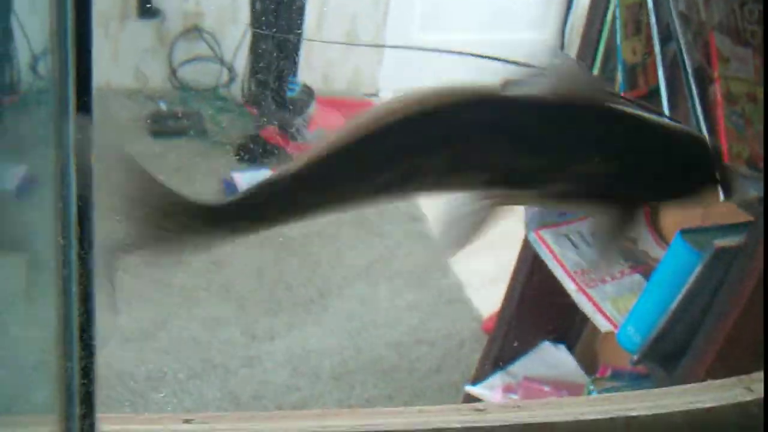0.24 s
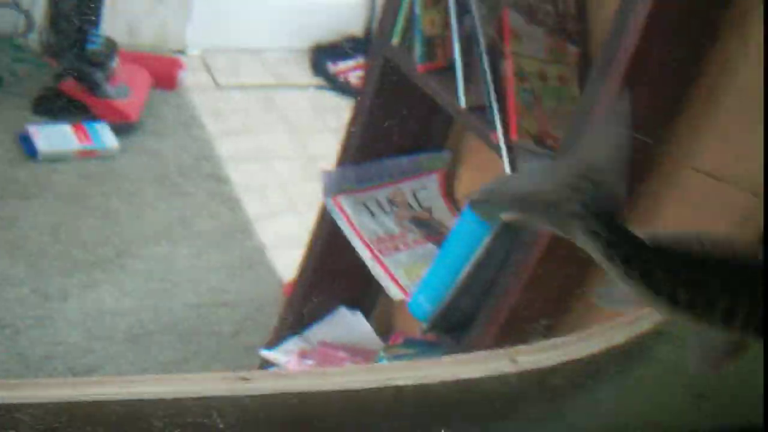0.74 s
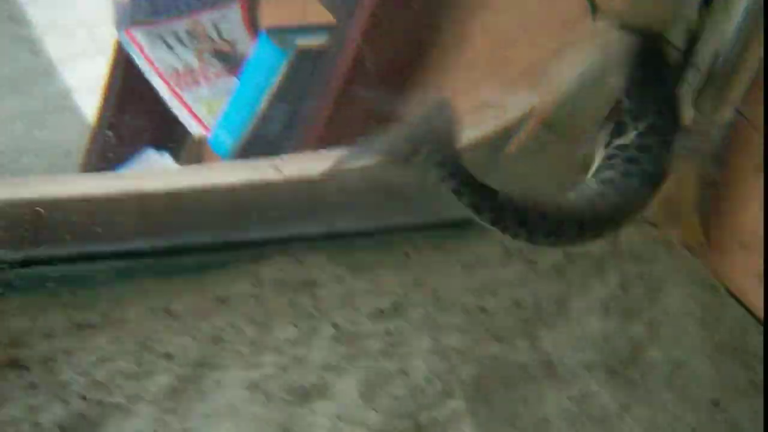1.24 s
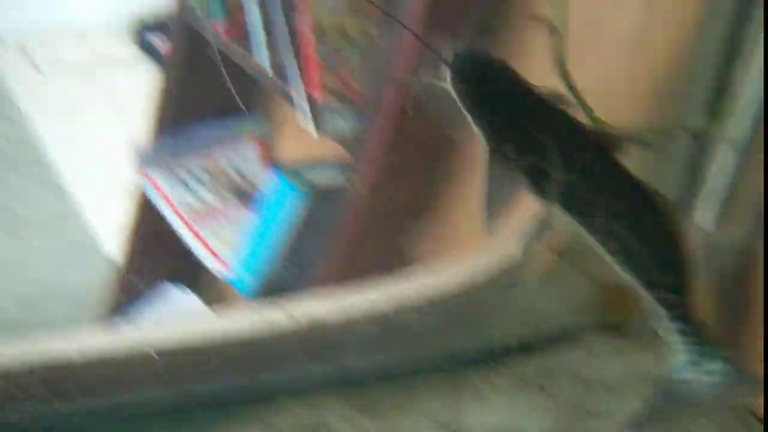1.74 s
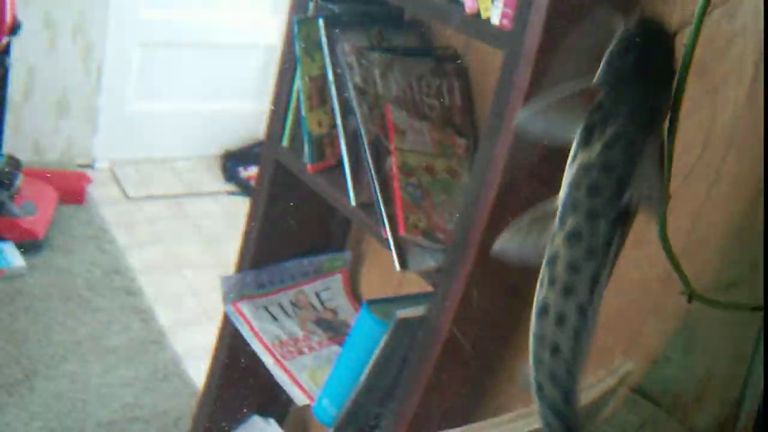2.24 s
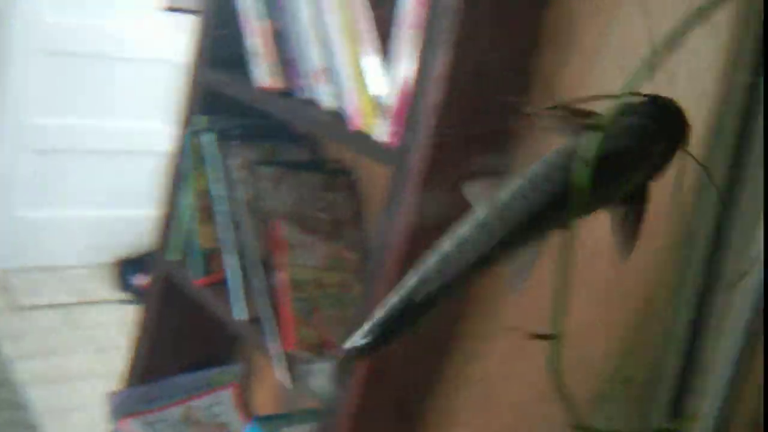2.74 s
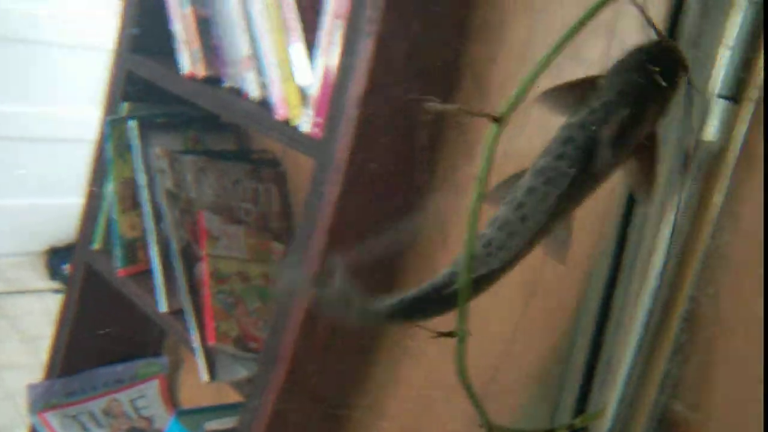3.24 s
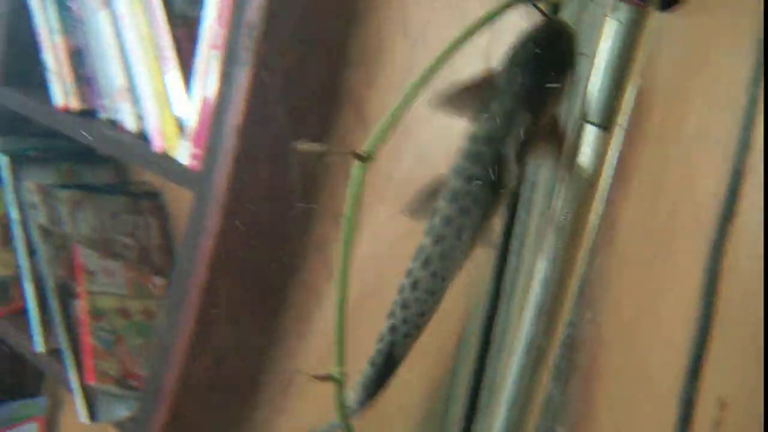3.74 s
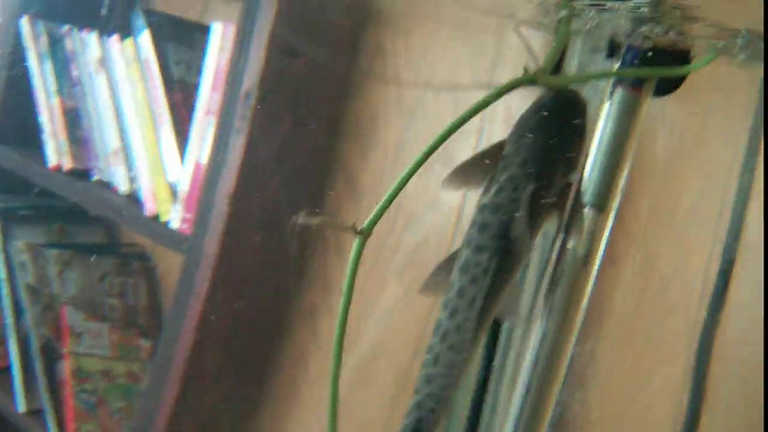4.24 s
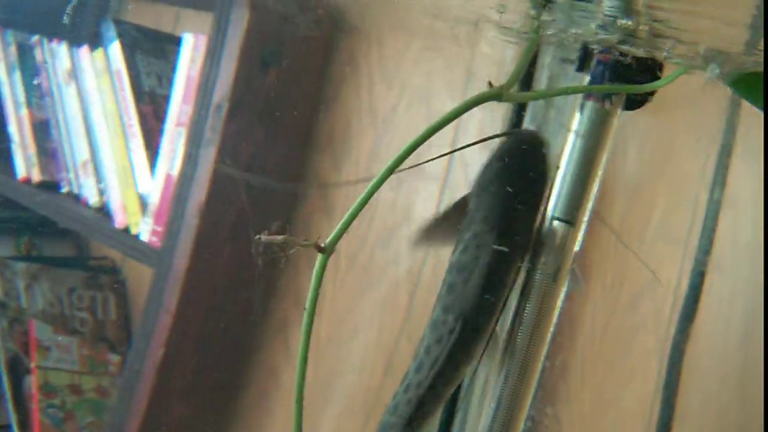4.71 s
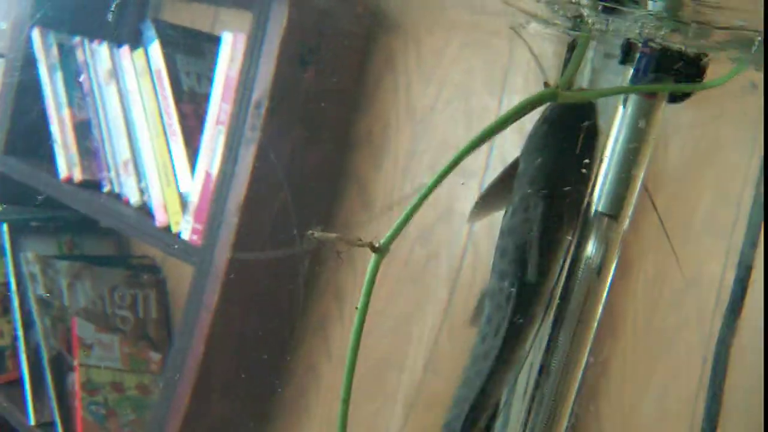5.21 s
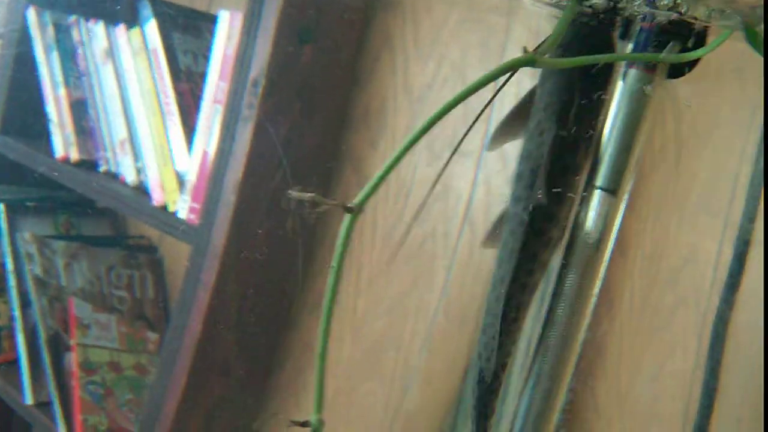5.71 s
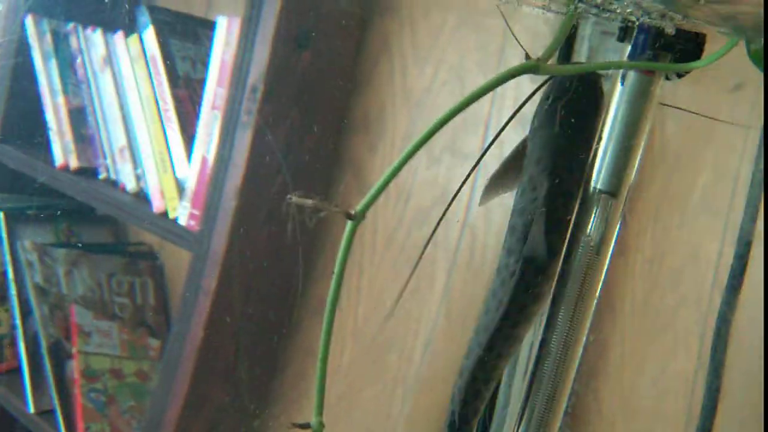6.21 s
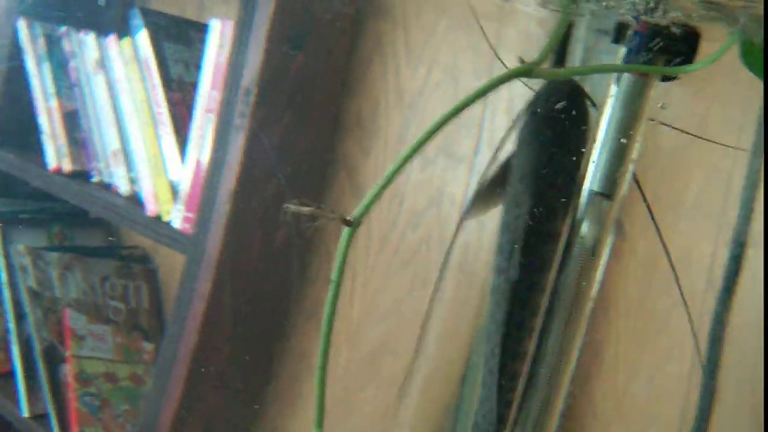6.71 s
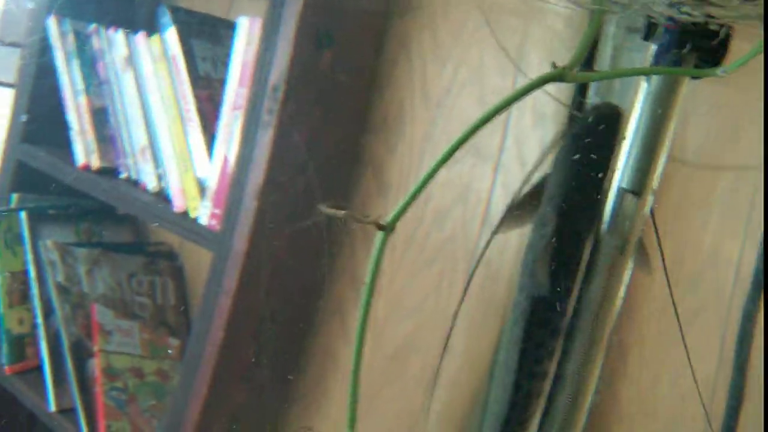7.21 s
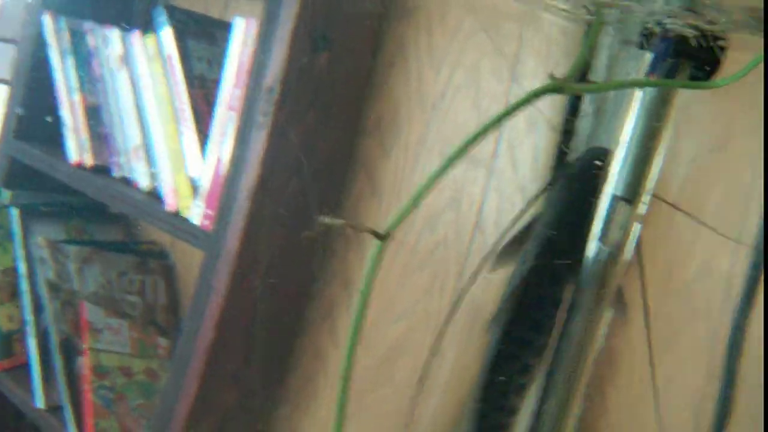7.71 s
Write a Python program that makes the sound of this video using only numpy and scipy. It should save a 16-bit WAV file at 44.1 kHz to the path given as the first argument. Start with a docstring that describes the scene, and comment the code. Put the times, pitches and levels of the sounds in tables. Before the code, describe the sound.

A home aquarium filter hums low while water churns and plops, then dull thuds knock the tank and small bubbles keep plinking.

```python
"""A filter pump hums close to the glass of a home aquarium, and its outflow churns the water: the hum is
a sum of mains-locked sines, the water is noise shaped by the tank's resonances. Drops and bubbles plink,
each a damped resonance that also rings the air space under the lid. Dull knocks excite the tank with
short pressure pulses. A hand-held camera adds noise rumble, hiss and a thin pulsing whine."""
import sys
import numpy as np
from scipy import signal
from scipy.fft import rfft, irfft
from scipy.io import wavfile

SR = 44100
rng = np.random.default_rng(int(sys.argv[2]) if len(sys.argv) > 2 else 0)


def to_wav(sig):
    """Store sig (one row per channel, or 1-D mono) as 16-bit WAV at the path in sys.argv[1].

    Samples outside -1..1 are clipped; the rate is SR.
    """
    pcm = np.clip(np.atleast_2d(sig), -1, 1) * 32767
    pcm = np.round(pcm).astype(np.int16)
    wavfile.write(sys.argv[1], SR, pcm.T)  # frames by channels


N = 351032
TIME = np.arange(N) / SR  # seconds
FREQS = np.fft.rfftfreq(N, 1 / SR)  # Hz

# Resonances of the filled tank. Each row: frequency in Hz, width in Hz, relative level in dB.
TANK = [(141.9, 7.2, 5.5), (166, 6.2, -0.5), (208, 16.3, -7), (254, 4.3, -8), (274.7, 9.9, -3.5),
        (294, 12.7, -3.5), (327.7, 17.4, -8.5), (451, 8.3, -10), (492, 6.7, -21.5), (519.6, 11, -15.5),
        (580.5, 9.6, -16), (634, 7.7, -15.5), (696.5, 10, -18)]
# How strongly the tank's vibration reaches the microphone, which starts close to the glass.
# Each row: time in seconds, level in dB.
NEARNESS = [(0, -1), (0.5, -2), (1.05, -7), (1.4, -7), (2.4, -7.5), (3, -11.5), (4.9, -13.5), (7.96, -12.5)]

SURGE_START_S, SURGE_END_S, SURGE_EASE_S = 0.13, 0.68, 0.3  # the outflow washes harder while it plops
BUBBLE_Q = 18.6  # sharpness of a ringing bubble


def undb(db):
    """Amplitude gain is the exponential of a level in decibels."""
    return 10 ** (np.asarray(db) / 20)


def nearness_db():
    """Coupling from tank to microphone, interpolated linearly in decibels at every sample."""
    s, db = np.transpose(NEARNESS)
    return np.interp(TIME, s, db)


def hold(start_s, end_s, ramp_s):
    """Trapezoidal envelope: 1 from start to end, with a straight ramp outside either end."""
    return np.clip(1 + np.minimum(TIME - start_s, end_s - TIME) / ramp_s, 0, 1)


def colour(points):
    """Spectral envelope: gain from (Hz, dB) points, straight lines over log frequency."""
    hz, db = np.transpose(points)
    return undb(np.interp(np.log(FREQS + 1e-9), np.log(hz), db))


def noise(gain):
    """Filtered white noise takes the spectrum of the filter; scaled to rms 1."""
    x = irfft(rfft(rng.standard_normal(N)) * gain, N)
    return x / np.sqrt(np.mean(x ** 2))


def walk(rate_hz):
    """Low-passed noise is a smooth random control, here of rms 1 and Gaussian bandwidth."""
    return noise(np.exp(-(FREQS / rate_hz) ** 2))


def resonance(f, hz, width):
    """Frequency response of one damped oscillator, gain 1 at its centre."""
    return 1j * f * width / (hz ** 2 - f ** 2 + 1j * f * width)


def body(f, modes):
    """Modal superposition: damped modes add, neighbours with opposite signs."""
    response = 0
    for k, (hz, width, db) in enumerate(modes):
        response = response + (-1) ** k * undb(db) * resonance(f, hz, width)
    return response


def ringing(modes):
    """Modes driven by independent turbulence add in power, not in amplitude."""
    power = sum(np.abs(undb(db) * resonance(FREQS, hz, width)) ** 2 for hz, width, db in modes)
    return noise(np.sqrt(power))


def add(out, s, sound, db):
    """Linear superposition of a short sound at time s, scaled to a peak level."""
    start = max(int(s * SR), 0)
    part = out[start:start + len(sound)]
    scaled = sound * undb(db) / np.abs(sound).max()
    part += scaled[:len(part)]


def plinks(rows, direct=0.081, onset=0.31, size=4096):
    """A bubble is a damped oscillator that swells and dies; the air under the lid reverberates it."""
    # Resonances of the air under the lid. Each row: frequency in Hz, width in Hz, relative level in dB.
    lid_modes = [(717, 21.6, 24), (835, 45, 10), (923, 15.4, 12.5), (1103, 39, 7), (1324, 27, 6.5),
                 (1490, 82, -7), (1643, 37, -1), (2176, 41, 0.5), (2407, 45, 4), (2765, 44, -1.5),
                 (3108, 64, -2), (3460, 33, -5), (3730, 56, -7.5), (4340, 66, -8.5), (5040, 66, -4.5),
                 (5730, 38, -6), (6200, 210, -6.5)]
    out, f = np.zeros(N), np.fft.rfftfreq(size, 1 / SR)
    lid = direct + body(f, lid_modes)
    for s, hz, db, q in rows:
        # the second, broader resonance softens the onset
        bubble = resonance(f, hz, hz / q) * resonance(f, hz, hz * onset)
        add(out, s, irfft(bubble * lid), db)
    return out


def chance_plinks(s, low_hz, high_hz, db, spread_db, q):
    """A bubble population: pitch random over log frequency, peak level random in decibels."""
    pitch, strength = rng.random((2, len(s)))
    hz = low_hz * (high_hz / low_hz) ** pitch
    peak_db = db + spread_db * (2 * strength - 1)
    return plinks(zip(s, hz, peak_db, np.full(len(s), q)))


def camera(hiss_db=-42, pulsing=0.7, whine_hz=1966.78, frame_hz=14.993):
    """Broadband noise from hand and microphone, plus harmonics switched in level at the frame rate."""
    # Rumble of the hand. Each row: frequency in Hz, relative spectral level in dB.
    rumble_spectrum = [(3, -4), (8, 0), (15, 0.5), (28, -4), (42, -8.5), (55, -11), (72, -16.5), (100, -22),
                       (160, -34), (300, -65.5)]
    # Microphone hiss. Each row: frequency in Hz, relative spectral level in dB.
    hiss_spectrum = [(100, -10), (500, 0.5), (1000, -1.8), (2000, -5), (4000, -7.5), (7000, -10),
                     (11000, -11.5), (16500, -13.5)]
    # Whine of the electronics. Each row: multiple of whine_hz, rms level in dB before the pulsing.
    whine_tones = [(1, -66), (2, -64.5), (3, -66), (4, -61.5), (7, -73), (8, -70.5)]
    rest_db, pan_db, settle_db_per_s = -20, 3, 0.37

    swing = hold(1.7, 3.92, 0.23)  # the hand swings the camera along the tank
    hand_db = rest_db + pan_db * swing - settle_db_per_s * TIME
    rumble = noise(colour(rumble_spectrum)) * undb(hand_db)
    hiss = noise(colour(hiss_spectrum)) * undb(hiss_db)
    whine = np.zeros(N)
    for k, db in whine_tones:
        whine += undb(db) * np.sin(2 * np.pi * round(k) * whine_hz * TIME)
    frames = 1 + pulsing * np.sign(np.cos(2 * np.pi * frame_hz * TIME))
    return rumble + hiss + np.sqrt(2) * whine * frames  # sqrt(2): rms to peak of a sine


def pump(mains_hz=60, shaft_db=-25.0, hum_db=-21.0, buzz_db=-22.5, swell_db_per_s=0.5):
    """Harmonics locked to the rotor: it turns at mains rate, the magnet pulls twice a turn, the casing buzzes."""
    # Overtones of the buzz. Each row: multiple of the mains frequency, level in dB relative to buzz_db.
    overtones = [(3, -1.5), (4, -8), (5, -13), (6, -19)]
    shaft_slope, hum_slope, buzz_slope = 0.79, 1.017, 1.46  # higher tones fade faster with distance

    near_db = nearness_db()
    swell_db = swell_db_per_s * TIME  # offsets part of the fading of the two lowest tones
    turn = 2 * np.pi * mains_hz * TIME + 0.041 * walk(2)  # rotor angle in radians
    shaft_level_db = shaft_db + shaft_slope * near_db + swell_db + 0.76 * walk(3.8)
    hum_level_db = hum_db + hum_slope * near_db + swell_db + 0.76 * walk(1.2)
    out = np.sin(turn) * undb(shaft_level_db) + np.cos(2 * turn) * undb(hum_level_db)
    for k, db in overtones:
        tone = np.sin(round(k) * turn + rng.uniform(0, 2 * np.pi))
        out += tone * undb(buzz_db + buzz_slope * near_db + db + 2.0 * walk(7.0))  # uneven buzz
    return np.sqrt(2) * out  # rms to peak of a sine


def water(stream_db=-40.0, churn_db=-24.5, wash_db=-35.5, surge_db=4, flutter_db=2.02, low_modes=7):
    """Turbulence is broadband: it streams through the filter, churns the low tank modes, washes the high."""
    # Steady run through the filter. Each row: frequency in Hz, relative spectral level in dB.
    stream_spectrum = [(50, 0), (90, -6), (140, -2.5), (210, -7), (310, -7), (400, -8), (500, -16),
                       (700, -45), (1500, -41)]
    churn_slope, wash_slope = 1.074, 1.33  # dB per dB of nearness
    churn_share = 0.23  # part of the surge that reaches the low modes

    near_db = nearness_db()
    surge = surge_db * hold(SURGE_START_S, SURGE_END_S, SURGE_EASE_S)
    churn = ringing(TANK[:low_modes]) * undb(churn_db + churn_slope * near_db + churn_share * surge)
    wash = ringing(TANK[low_modes:]) * undb(wash_db + wash_slope * near_db + surge)
    stream = noise(colour(stream_spectrum)) * undb(stream_db)
    return (stream + churn + wash) * undb(flutter_db * walk(9.8))


def trickle(count=130):
    """Poorly resonant bubbles of low Q: many faint ones where the outflow meets the surface."""
    s = rng.random(count) * N / SR
    return chance_plinks(s, low_hz=900, high_hz=6500, db=-41, spread_db=2, q=5)


def patter(count=40):
    """Stratified chance: small quiet bubbles ring, one at random in each equal stretch of time."""
    s = (np.arange(count) + rng.random(count)) / count * N / SR
    return chance_plinks(s, low_hz=2000, high_hz=6300, db=-38, spread_db=4.0, q=BUBBLE_Q)


def gurgle(count=10):
    """Larger bubbles resonate lower: the surging outflow sheds a cloud of middling ones."""
    s = rng.random(count) * (SURGE_END_S + SURGE_EASE_S)
    return chance_plinks(s, low_hz=800, high_hz=1900, db=-36, spread_db=3, q=BUBBLE_Q)


def knocks(ring=.45, size=16384):
    """Impulse excitation: a contact gives a pressure pulse and a brief tick, and the tank's modes ring."""
    # Dull contacts with the tank. Each row: start in seconds, peak level in dB,
    # softness (time constant of the pulse) in milliseconds, peak level of the tick in dB.
    contacts = [(1.3512, -4.5, 0.87, -45), (1.596, -14, 0.48, -45), (1.8211, -2, 0.44, -38),
                (1.916, -11, 0.9, -45), (2.0824, -7, 0.89, -42), (2.3724, -12, 0.55, -45),
                (2.7844, -11, 0.66, -45), (3.312, -21, 0.24, -31), (4.0066, -13.5, 0.31, -26),
                (4.566, -30, 0.32, -36), (6.326, -21, 0.32, -31), (6.336, -19, 0.36, -34)]
    glass_hz, glass_width_hz = 190, 1800
    tick_hz, tick_width_hz, tick_ms = 2600, 6000, 1.8

    out, f = np.zeros(N), np.fft.rfftfreq(size, 1 / SR)
    tank = resonance(f, glass_hz, glass_width_hz) + ring * body(f, TANK)
    tick_filter = resonance(f, tick_hz, tick_width_hz) ** 2
    ms = 1000 * np.arange(size) / SR
    for s, db, soft, tick_db in contacts:
        push = (ms / soft) ** 2 * np.exp(-ms / soft)
        add(out, s, -irfft(rfft(push) * tank), db)
        scrape = rng.standard_normal(size) * np.exp(-ms / tick_ms)
        add(out, s, irfft(rfft(scrape) * tick_filter), tick_db)
    return out


def drops(tick_q=2.8):
    """Damping tells drops apart: heavy ones slap, then a trapped bubble rings; bubbles ring; light ones tick."""
    # The clearest single bubbles. Each row: start in seconds, pitch in Hz, peak level in dB.
    bubbles = [(0.25, 1400, -26.5), (0.658, 4520, -29), (0.68, 1020, -28), (0.774, 2460, -32.5),
               (0.874, 3020, -31), (0.999, 1500, -29.5), (1.326, 3100, -25.5), (1.362, 2315, -14.5),
               (1.525, 5850, -27), (1.96, 700, -32.5), (1.963, 1500, -31.5), (1.973, 3650, -31),
               (2.134, 2270, -22), (2.29, 5820, -30.5), (2.596, 685, -29), (2.654, 2900, -29.5),
               (2.777, 2150, -22.5), (3.159, 3850, -30), (3.276, 4760, -33), (3.708, 2410, -32.5),
               (3.821, 2880, -25.5), (3.944, 4080, -24), (4.023, 3560, -26), (4.144, 3640, -32),
               (4.404, 1930, -28.5), (4.474, 2900, -31.5), (4.565, 1190, -31.5), (4.609, 3020, -32),
               (4.727, 5870, -32), (4.756, 2300, -28.5), (4.876, 2980, -33), (5.048, 2630, -31),
               (5.197, 2200, -30), (5.371, 2100, -31.5), (5.473, 686, -35), (5.628, 3070, -29),
               (5.753, 2200, -23.5), (6.103, 1850, -31), (6.159, 2420, -32), (6.225, 5930, -28.5),
               (6.315, 3110, -24), (6.397, 2090, -27), (6.485, 700, -37), (6.595, 2670, -31),
               (6.996, 3280, -34.5), (7.189, 2620, -34.5), (7.733, 2740, -32)]
    # Drops that trap no bubble. Each row: start in seconds, pitch in Hz, peak level in dB.
    ticks = [(1.324, 2630, -21.5), (1.765, 5050, -25.5), (3.461, 5400, -31), (6.555, 5090, -32),
             (7.114, 4900, -27.5)]
    # Heavy drops. Each row: start in seconds, pitch in Hz, peak level of the slap in dB,
    # sharpness Q of the slap, delay of the trapped bubble in seconds, peak level of the bubble in dB.
    plops = [(0.1585, 858, -16, 2.7, 0.0096, -20.5), (0.354, 1630, -15, 0.35, 0.002, -12),
             (0.469, 1720, -18.5, 2, 0.002, -42), (0.5126, 1104, -30, 2.7, 0.00746, -22),
             (0.6335, 773, -8.5, 3.4, 0.015, -18), (1.507, 2740, -18.5, 6, 0.0039, -32),
             (1.657, 2820, -19, 4.5, 0.0062, -37)]

    rows = [(s, hz, db, BUBBLE_Q) for s, hz, db in bubbles]
    rows += [(s, hz, db, tick_q) for s, hz, db in ticks]
    for s, hz, slap_db, slap_q, delay, db in plops:
        rows.append((s, hz, slap_db, slap_q))
        rows.append((s + delay, hz, db, BUBBLE_Q / 2))
    return plinks(rows)


def scene():
    """Linear superposition: all sounds add at one microphone next to the glass."""
    background = camera() + pump() + water()
    bubbling = trickle() + patter() + gurgle() + drops()
    return (background + bubbling + knocks())[None]


def record(dry):
    """Band limiting: the camera cuts the top with a steep elliptic low-pass."""
    top_hz = 15750
    low_pass = signal.ellip(12, .1, 80, top_hz, fs=SR, output="sos")
    return signal.sosfilt(low_pass, dry)


dry = scene()
out = record(dry)
to_wav(out)
```